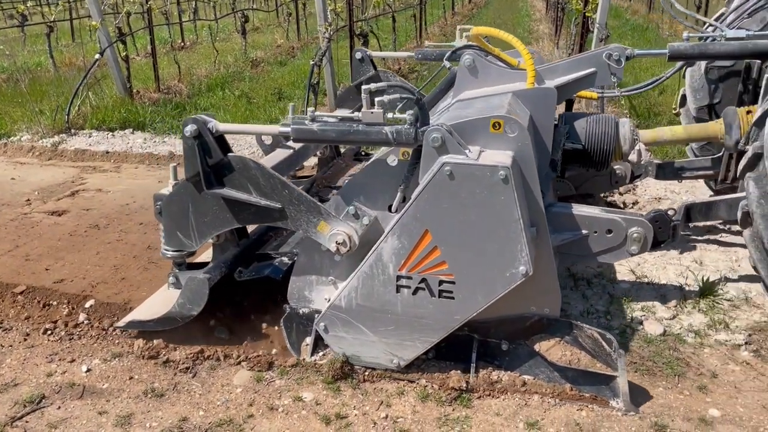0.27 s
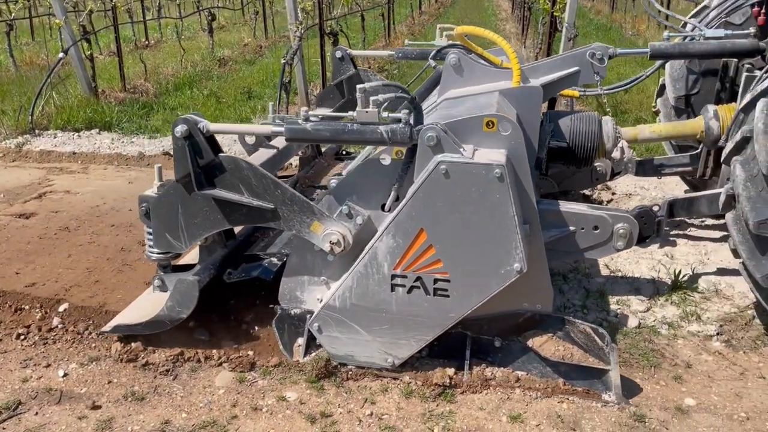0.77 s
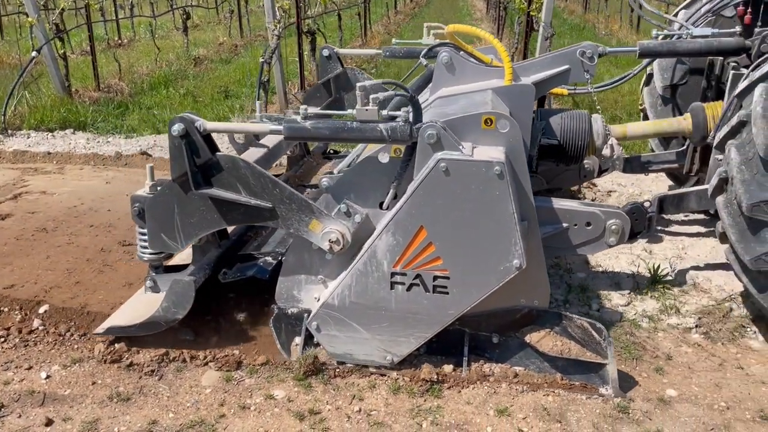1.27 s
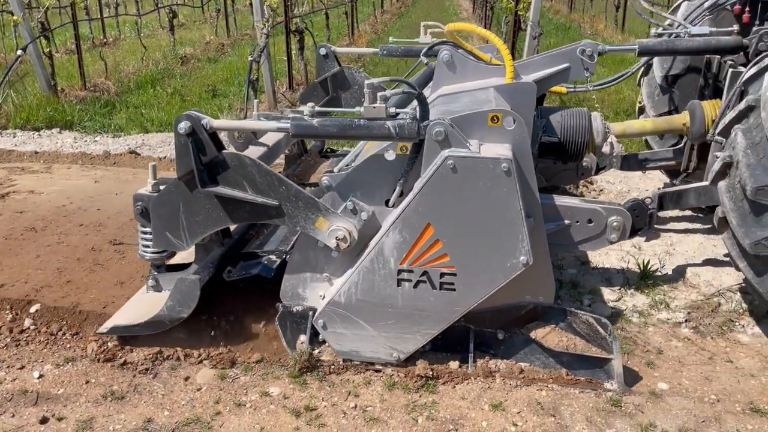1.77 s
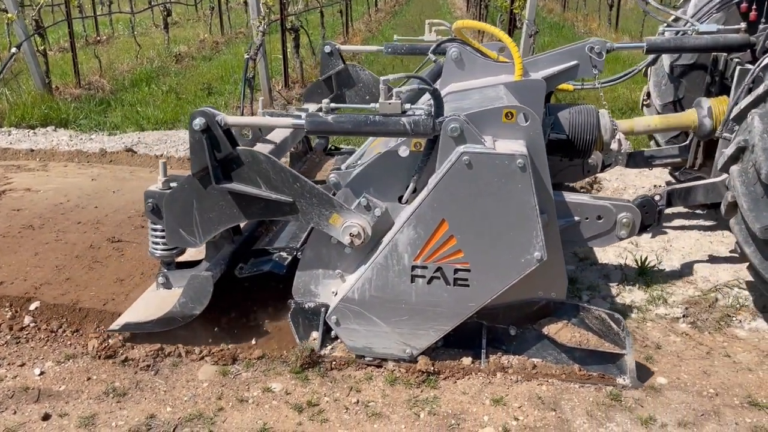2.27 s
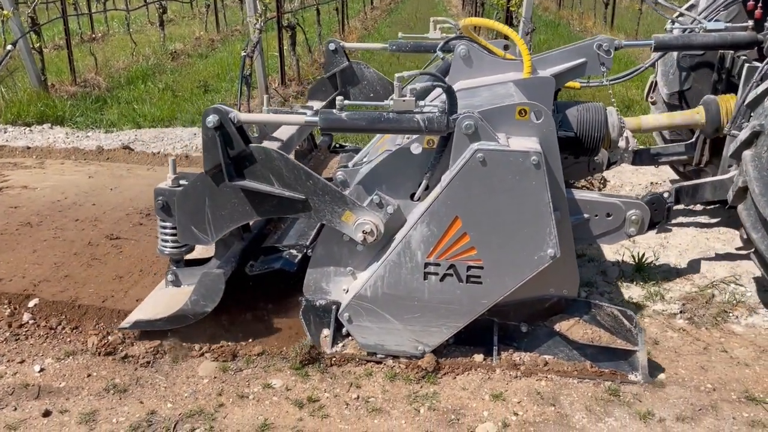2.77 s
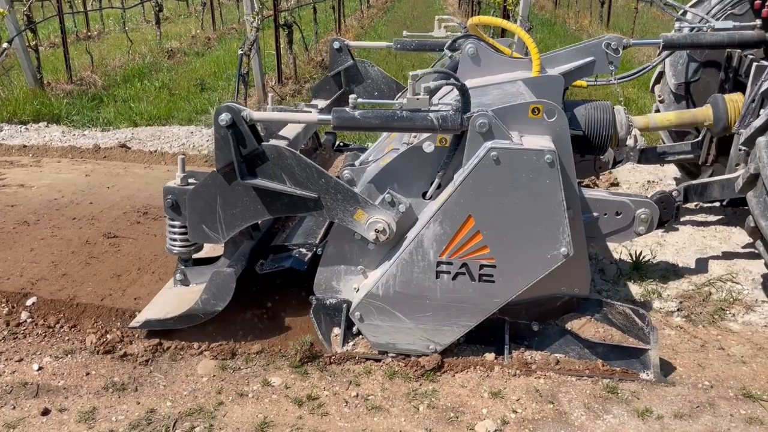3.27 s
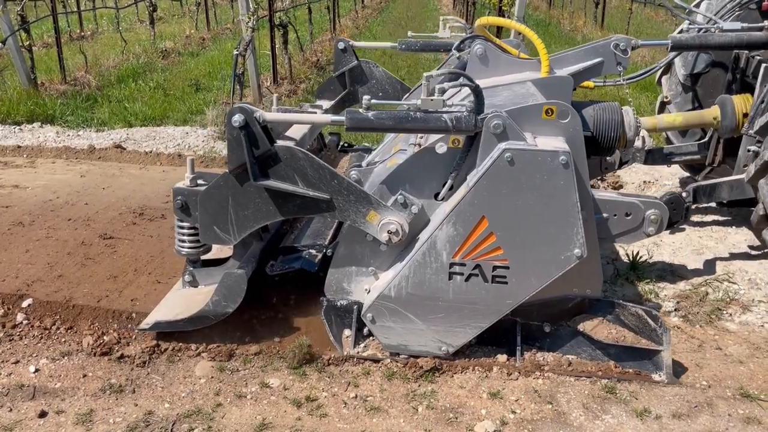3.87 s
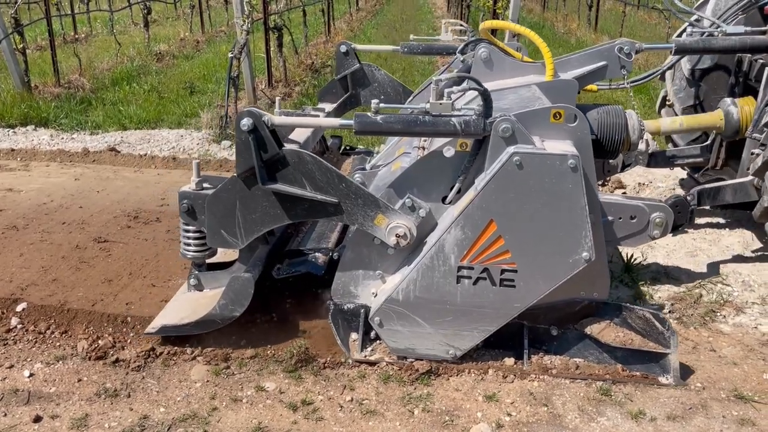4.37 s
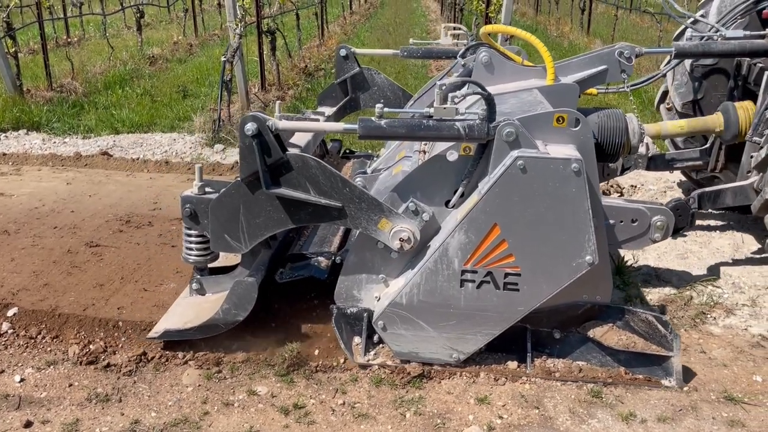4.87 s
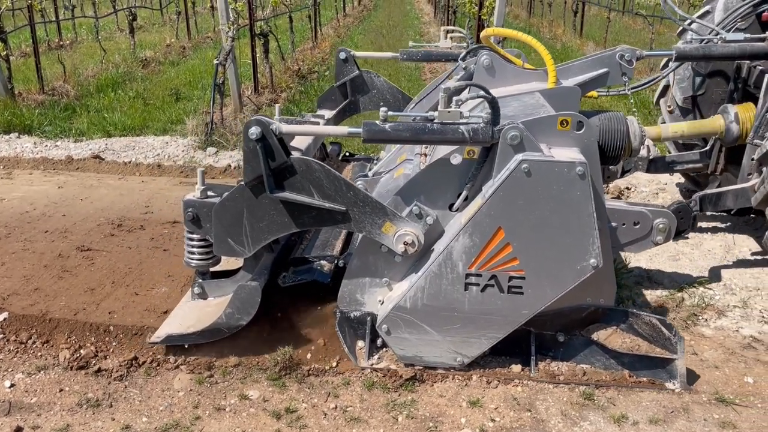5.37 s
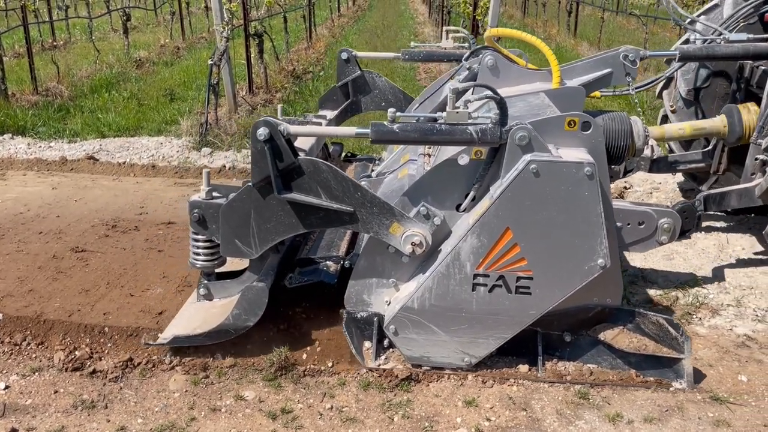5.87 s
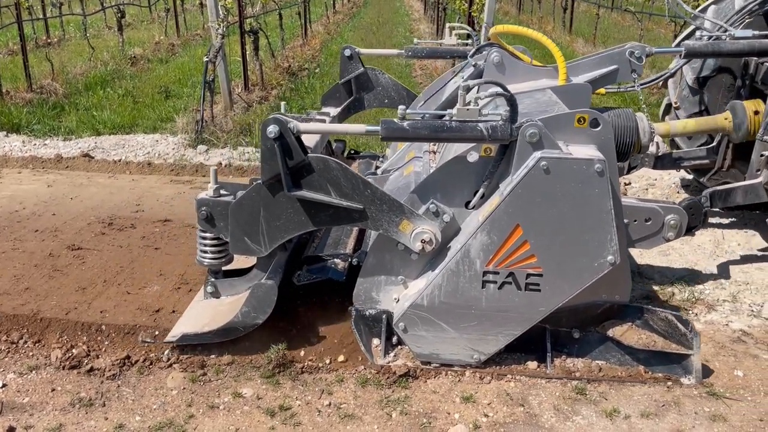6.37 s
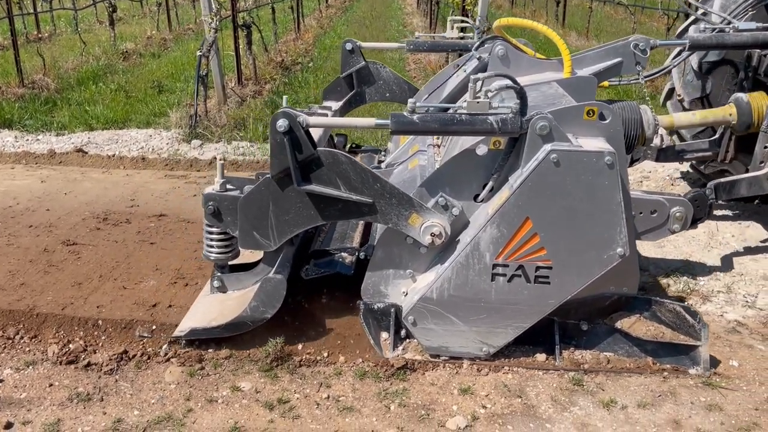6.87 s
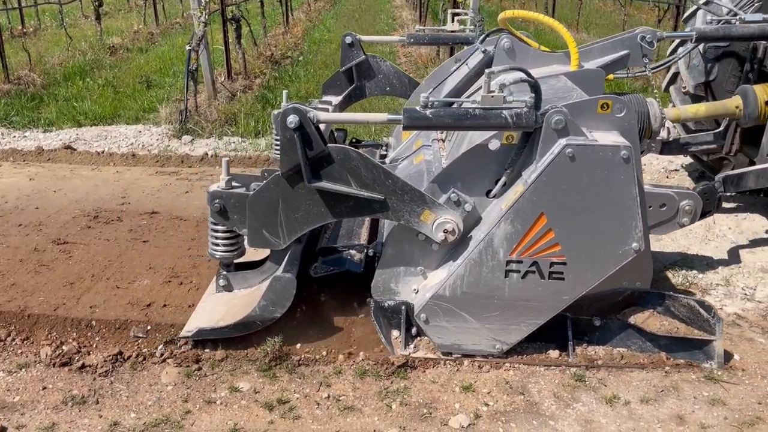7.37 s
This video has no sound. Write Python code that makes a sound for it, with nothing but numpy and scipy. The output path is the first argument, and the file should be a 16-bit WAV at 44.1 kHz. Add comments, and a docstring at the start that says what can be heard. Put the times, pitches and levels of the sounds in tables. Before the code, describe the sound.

Continuous gritty machine roar and diesel hum close by, broken by sharp stone snaps, dull knocks on steel and a few heavier crunches.

```python
"""A stone crusher is dragged slowly past by a tractor, a few metres away, in the open.
Its rotor roars as filtered noise and random knocks: soil, gravel and grit churned in a steel housing.
Under the roar, sine tones that follow one crankshaft make the hum of the diesel and the drive line.
Now and then a stone splits (a short noise burst and a ping) or is flung against the housing (a thud);
four boulders are struck, ground along the housing and broken."""
import sys
import numpy as np
from scipy import signal
from scipy.fft import rfft, irfft
from scipy.io import wavfile

SR = 44100
rng = np.random.default_rng(int(sys.argv[2]) if len(sys.argv) > 2 else 0)


def wav_record(signal):
    """Record a signal, one row per channel, as 16-bit PCM in the file named by sys.argv[1]."""
    frames = np.transpose(np.atleast_2d(signal))
    bounded = np.clip(frames, -1, 1)
    # unit amplitude maps onto the largest positive 16-bit level
    quanta = np.round(bounded * 32767).astype(np.int16)
    wavfile.write(sys.argv[1], SR, quanta)


N = 336042
T, BINS = np.arange(N) / SR, np.fft.rfftfreq(N, 1 / SR)  # time in s, frequencies in Hz
EDGE_HZ = 15800  # upper limit of the sound

# crankshaft speed, sagging as the rotor bites: time_s, speed (turns per second)
CRANK_SPEED = [(0.0, 31.29), (0.54, 31.51), (1.09, 31.12), (1.31, 31.04), (1.47, 31.29), (1.66, 31.4),
               (1.81, 31.31), (2.07, 31.45), (2.22, 31.33), (2.52, 31.47), (2.72, 31.26), (2.88, 31.59),
               (3.1, 31.65), (3.4, 31.23), (3.97, 31.13), (4.14, 31.32), (4.26, 31.25), (4.47, 31.61),
               (4.68, 31.64), (4.85, 31.5), (4.99, 31.2), (5.27, 31.11), (5.51, 31.49), (5.88, 31.08),
               (6.07, 31.15), (6.57, 31.02), (6.68, 31.11), (6.82, 30.93), (7.21, 31.06), (7.62, 31.45)]
ROTOR_RATIO, GEAR_RATIO = .4134, 24.29  # rotor turns and gear teeth per crankshaft turn
# the sag below the free speed (turns per second) is the load; the speed answers it this late
FREE_SPEED, INERTIA_S = 31.7, 0.17

# spectrum of the grit, before the housing colours it: pitch_hz, relative_db
GRIT_SPECTRUM = [(600, -25), (1800, -3.5), (2600, 0), (3700, -2.5), (4800, -5), (5600, -9), (7500, -10.3),
                 (9700, -15.5), (11000, -19), (12000, -20.2), (13000, -23.8), (15500, -25)]
# resonances of the steel housing: pitch_hz, width_hz, level_db against the direct sound
HOUSING_MODES = [(572, 52, 0.5), (662, 7.2, -2), (1005, 20, 1), (1099, 31, 1.5), (1321, 9.6, 5),
                 (1450, 21, 0), (1510, 59, -6), (1609, 30, 4), (1894, 93, 1.5), (2137, 11, -5.5),
                 (2490, 28, -6.5), (3660, 56, -17), (4750, 200, -3.5)]
# boulders, struck once, ground and then broken: strike_s, break_s, strike_db, ring_db, ring_hz, grinding_db,
# crack_db, brightness (dB per octave), crunch_db, crunch_hz, decay_s, anvil_db; function settings shift some
BOULDER_EVENTS = [(1.272, 1.333, -18.5, -12, 1238, -16, -23, 3.5, -24, 950, 0.02, -30),
                  (3.29, 3.3365, -17.5, -28, 1500, -32, -12.5, 0.5, -13, 610, 0.013, -16),
                  (4.089, 4.139, -20, -19, 2210, -9.5, -17.5, -3, -11.5, 725, 0.033, -10),
                  (4.627, 4.66, -27, -27, 1460, -28, -18.5, -2.5, -16.5, 704, 0.049, -15)]
GRIND_S = 0.1  # half width of the swell while a boulder labours in the chamber
PING_AFTER_S = .001  # a ring starts this long after its crack
BLOW_DECAY_S, PIECE_DECAY_S = 0.0085, 0.0036


def amp(db):
    """Turns decibels into a gain."""
    return 10 ** (np.asarray(db) / 20)


def evened(x):
    """Scales a sound to an average (rms) level of 1."""
    return x / np.sqrt(np.mean(x ** 2) + 1e-20)


def read(points, hz):
    """Reads a curve of frequency between its points, on a log-frequency axis."""
    f, value = np.transpose(points)
    return np.interp(np.log(hz + 1), np.log(f + 1), value)


def track(rows, axis=1):
    """Reads one column of a curve of time at every sample."""
    rows = np.asarray(rows)
    return np.interp(T, rows[:, 0], rows[:, axis])


def add(mix, s, sound):
    """Mixes a sound in, starting at time s."""
    part = mix[:, max(round(s * SR), 0):][:, :sound.shape[1]]
    part += sound[:, :part.shape[1]]


def wander(rate_hz):
    """A smooth random curve of rms 1, changing up to about rate_hz times a second."""
    slow = rfft(rng.standard_normal(N // 64))
    slow = irfft(slow / (1 + (BINS[:len(slow)] / rate_hz) ** 4))
    return evened(np.interp(T, np.linspace(0, T[-1], len(slow)), slow))


def colour(x, gain):
    """Filters a sound by a gain for each frequency."""
    return irfft(rfft(x) * gain, x.shape[-1])


def housing(hz):
    """Response of the steel casing: the direct sound plus its ringing panels."""
    return 1 + sum(amp(db) / (1 + 2j * (hz - f) / width) for f, width, db in HOUSING_MODES)


def ripple(hz, depth_db, spacing_hz=45):
    """Countless small modes of the steelwork leave fine peaks and dips, deepest in the treble."""
    knots = np.arange(0, SR / 2, spacing_hz)
    heights = rng.standard_normal(4096)[:len(knots)]
    depth = depth_db * np.minimum(hz / 2500, 1)  # full depth from 2500 Hz up
    return amp(depth * np.interp(hz, knots, heights))


def impacts(per_s, spread_db):
    """Random knocks, most small and a few large, on the direct and the scattered path."""
    strength = amp(spread_db * np.minimum(rng.exponential(1, N), 5))
    size = strength * (rng.random(N) < per_s / SR)
    return evened(size * rng.standard_normal((2, N)))


def nearness():
    """How far the machine has drawn alongside, as a share from 0 (far) to 1."""
    # time_s, share (0-1)
    alongside = [(0, 0.3), (1.5, 0.39), (2.9, 0.18), (3.6, 0.69), (5.4, 0.56), (5.8, 0.94), (7.62, 1)]
    return np.clip(track(alongside), 0, 1)


def swell(s, width_s):
    """A smooth rise to 1 and fall around time s."""
    return np.exp(-((T - s) / width_s) ** 2)


def flow_db(law):
    """Material gets louder with the load, with nearness and around each boulder."""
    idle_db, load_db, near_db, boulder_db = law
    sag = FREE_SPEED - np.interp(T + INERTIA_S, *np.transpose(CRANK_SPEED))
    grinding = sum(swell((row[0] + row[1]) / 2, GRIND_S) for row in BOULDER_EVENTS)
    return idle_db + load_db * sag + near_db * nearness() + boulder_db * grinding


def pockets_db():
    """Extra level (now and then a little less) while the rotor runs through coarse gravel."""
    # time_s, half_width_s, level_db
    pockets = [(.36, 0.027, 2.7), (.74, .14, -0.5), (3.43, .05, 2.5), (5.1, 0.025, 1), (5.55, 0.09, 0.4),
               (5.9, 0.17, .9), (6.26, 0.089, 2.2), (6.72, 0.1, 0.5), (7.02, .15, 0.3)]
    return sum(db * swell(s, width) for s, width, db in pockets)


def tone(cycles, jitter=0.16):
    """A sine of rms 1 with a slightly unsteady phase (jitter in radians)."""
    return np.sqrt(2) * np.sin(2 * np.pi * (cycles + rng.random()) + jitter * wander(3.0))


def tones(turns, table, flutter=0.35, jitter=0.068):
    """Multiples of one shaft; each flutters a little and shifts in level as the machine passes."""
    near = nearness()
    out = 0
    for multiple, far_db, near_db in table:
        level = amp(far_db) * (1 - near) + amp(near_db) * near
        out = out + level * (1 + flutter * wander(1.56)) * tone(multiple * turns, jitter)
    return out


def drive_line(turns, drone_flutter=0.4, drone_flutter_hz=7):
    """Diesel, rotor and gearbox all follow the crankshaft; their clearest tones swell and fade slowly."""
    # engine tones, half orders included: multiple of the crankshaft, far_db, alongside_db
    engine_tones = [(2, -53, -43.5), (4, -43, -42), (5, -37, -39), (5.5, -37, -48), (6, -38, -36.5),
                    (13, -45, -45), (16, -48, -59), (17, -44, -52), (23, -47, -57), (43, -55, -39),
                    (44, -52, -50), (45, -44, -42.5), (47, -43, -42), (50.5, -60, -45), (60, -52, -47),
                    (62, -54, -47)]
    # rotor and belt tones: multiple of the rotor, far_db, alongside_db
    rotor_tones = [(8, -38, -42), (11, -43, -58), (13, -55, -47), (16, -40, -41), (17, -44, -48),
                   (24, -52, -37), (32, -43, -47), (50, -41.5, -42)]
    # time_s, rotor_hum_db, gearbox_whine_db, its_octave_db, engine_whine_db, engine_whistle_db
    clear_levels = [(0, -38, -35, -52, -57, -47), (.6, -37.5, -38, -54, -40, -34.5),
                    (1.3, -30, -34, -52, -43, -52), (2, -32, -37, -37, -39.5, -45),
                    (2.7, -30.5, -36.5, -50, -40.5, -44), (3.25, -31, -32.5, -38, -33, -40),
                    (3.85, -27, -35, -36, -45, -37.5), (4.4, -31, -37, -40, -38.5, -39),
                    (5.1, -34, -35.5, -43, -44, -41), (6, -29.5, -39.5, -56, -44, -41),
                    (6.7, -29.5, -37.5, -55, -49, -37.5), (7.2, -34.5, -33.5, -47, -40.5, -38.5)]
    # parts of the engine whine: multiple of the crankshaft, relative_db
    whine_parts = [(15, 2.5), (21, -3), (30, 0)]
    # the rotor's low drone comes and goes with its bite: time_s, level_db before its flutter
    drone_levels = [(0, -39), (1.1, -36), (2.8, -43), (3.3, -39), (3.55, -30), (4, -33), (4.3, -28),
                    (4.7, -32), (5.15, -39), (5.6, -30.5), (6.1, -37), (6.6, -33), (7.62, -35)]
    rotor_turns, teeth = turns * ROTOR_RATIO, turns * GEAR_RATIO

    hum, whistle = tone(25 * rotor_turns), tone(31 * turns)
    engine_whine = sum(amp(db) * tone(multiple * turns) for multiple, db in whine_parts)
    clearest = [hum, tone(teeth), tone(2 * teeth), engine_whine, whistle]
    clear = sum(sound * amp(track(clear_levels, axis=k + 1)) for k, sound in enumerate(clearest))

    drone = tone(9 * rotor_turns) * amp(track(drone_levels))
    drone = drone * (1 + drone_flutter * wander(drone_flutter_hz))
    return clear + tones(turns, engine_tones) + tones(rotor_turns, rotor_tones) + drone


def soil(lumps_db=0.0):
    """Churned earth shakes the whole frame: a low rumble of filtered noise."""
    # pitch_hz, relative_db
    spectrum = [(20, -60), (30, -39), (40, -17), (60, -10), (85, -4), (115, 1), (170, -5), (250, -8),
                (400, -20), (900, -93)]
    # unloaded_db, db per turn a second of sag, extra_db alongside, extra_db around a boulder
    law = (-29, 1.6, 3, 4)
    rumble = evened(colour(rng.standard_normal((2, N)), amp(read(spectrum, BINS))))
    return rumble * amp(flow_db(law) + lumps_db * wander(8.1))


def gravel(turns, throb=0.067, firing=0.039, knocks=0.4, drum_hz=285, uneven_db=0.83):
    """Gravel drums on the housing, surging once a rotor turn and with each firing of the diesel."""
    # before the housing colours it: pitch_hz, relative_db
    spectrum = [(80, -22), (170, -7), (255, 1.5), (320, 2), (380, -4.5), (480, -2.5), (570, -4.5),
                (800, -1.5), (880, -9), (1200, -8.5), (1550, -9.5), (1770, -17.5), (2400, -14),
                (5000, -46.5)]
    # unloaded_db, db per turn a second of sag, extra_db alongside, extra_db around a boulder
    law = (-26.5, 2.5, 2, 0.9)
    # level of the coarse lumps against the gravel: far_db, alongside_db
    lumps_db = (-18, -5.5)
    near = nearness()
    drumming = knocks * impacts(1100, 1.6) + rng.standard_normal((2, N))
    rotor_surge = throb * near * np.sin(2 * np.pi * ROTOR_RATIO * turns)
    surge = 1 + rotor_surge + firing * np.sin(2 * np.pi * 2 * turns)  # two firings a turn
    steel = housing(BINS) * ripple(BINS, 2.7)
    roar = evened(colour(drumming * surge, amp(read(spectrum, BINS)) * steel))

    # larger lumps thump in a low, broad resonance of the chamber
    chamber = 1 / (1 + (np.log2((BINS + 1) / drum_hz) / 0.48) ** 4)
    lumps = evened(colour(impacts(170, 0.73) * surge, chamber))
    mixed = roar + amp(np.interp(near, [0, 1], lumps_db)) * lumps
    return mixed * amp(flow_db(law) + pockets_db() + uneven_db * wander(6.3))


def tumbling(low_hz=400, high_hz=2100, cycles=4, clump_db=2.5, pocket_share=1.7, count=24, size=4096):
    """Fist-sized stones tumble in the chamber in clumps, with hollow knocks of many pitches."""
    # unloaded_db, db per turn a second of sag, extra_db alongside, extra_db around a boulder
    law = (-38.5, 6, 3, 2)
    t, out = np.arange(size) / SR, np.zeros((2, N))
    for hz in np.geomspace(low_hz, high_hz, count):
        shape = (1 - np.exp(-t * hz)) * np.exp(-t * hz / cycles)
        knock = shape * np.sin(2 * np.pi * hz * t)
        # about 14 knocks a second at each pitch
        out += signal.oaconvolve(impacts(14, 2.0), knock[None], axes=1)[:, :N]
    return evened(out) * amp(flow_db(law) + pocket_share * pockets_db() + clump_db * wander(5.1))


def grit(chips=0.57, chip_s=0.011, flicker_db=0.65):
    """A hiss of fine grit with little bursts where chips break."""
    # unloaded_db, db per turn a second of sag, extra_db alongside, extra_db around a boulder
    law = (-34, 1.5, 2.5, 0)
    ticks = np.minimum(impacts(90, 2.5)[0] ** 2, 2500)
    # each tick leaves a burst that dies away over chip_s
    bursts = evened(np.sqrt(signal.lfilter([1], [1, -np.exp(-2 / (chip_s * SR))], ticks)))
    spray = rng.standard_normal((2, N)) * np.sqrt(1 + (chips * bursts) ** 2)
    spray = spray + 0.13 * impacts(1500, 2.5)
    steel = np.sqrt(housing(BINS)) * ripple(BINS, 2.3, spacing_hz=32)
    hiss = evened(colour(spray, amp(read(GRIT_SPECTRUM, BINS)) * steel))
    return hiss * amp(flow_db(law) + flicker_db * wander(7.1))


def blow(db, centre, decay, rise_cycles=1, narrow_db=5.5, rattle_db=3.0, rattle_s=0.0034,
         ring_db=-11, ring_s=0.014, ring_hz=2200, size=16384):
    """A stone rattles against the housing: noise around one pitch; the panels ring on briefly."""
    t, hz = np.arange(size) / SR, np.fft.rfftfreq(size, 1 / SR)
    octaves = np.log2((hz + 1) / centre)
    body = amp(-narrow_db * octaves ** 2 / np.sqrt(1 + (octaves / 2) ** 2))
    body = body / (1 + (75 / (hz + 1)) ** 4)  # little below 75 Hz
    rattle = amp(rattle_db * np.interp(t / rattle_s, np.arange(size), rng.standard_normal(size)))
    shape = (1 - np.exp(-t * centre / rise_cycles)) * np.exp(-t / decay)
    thud = evened(colour(rng.standard_normal((2, size)) * rattle, body) * shape)
    thud = thud * np.sqrt(np.mean(shape ** 2))

    ring = 0
    for f, width, level in HOUSING_MODES:
        gain = amp(level) / (1 + (2 * np.log2(f / ring_hz)) ** 2)
        fade = np.exp(-t * width / 30 / ring_s)  # a panel 30 Hz wide dies away over ring_s
        ring = ring + gain * fade * np.sin(2 * np.pi * (f * t + rng.random()))
    hardness = min(centre / 500, 1) ** 2  # deep, soft blows ring the panels less
    return amp(db) * (thud + amp(ring_db) * hardness * ring)


def thump(db, hz, decay, rise_cycles=0.4, size=16384):
    """One low mode, pushed once and dying away."""
    t = np.arange(size) / SR
    shape = (1 - np.exp(-t * hz / rise_cycles)) * np.exp(-t / decay)
    return amp(db) * np.sqrt(2) * shape / shape.max() * np.sin(2 * np.pi * hz * t) * np.ones((2, 1))


def blows(rattle_db=-3, solid_db=-9):
    """Stones that bounce off the housing unbroken: a solid knock inside a short rattle."""
    # start_s, level_db before the two shares above, centre_hz of the thud
    hits = [(0.244, -9, 110), (.325, -7.5, 185), (1.164, -17, 1400), (1.192, -21, 790), (1.281, -13, 327),
            (2.885, -11.5, 200), (3.637, -12, 910), (4.711, -7, 270), (4.729, -17, 730), (5.1, -12, 644),
            (5.235, -7.5, 202), (5.484, -8.5, 215), (6.026, -11, 242), (6.158, -13.5, 607),
            (6.198, -10, 252), (6.234, -12, 265), (6.256, -9.5, 416), (6.278, -4.5, 260),
            (6.307, -8.5, 280), (6.63, -10, 169), (6.978, -18, 1500), (7.108, -13, 1400),
            (7.124, -17, 1200)]
    out = np.zeros((2, N))
    for s, db, centre in hits:
        add(out, s, blow(db + rattle_db, centre, BLOW_DECAY_S))
        add(out, s, thump(db + solid_db, centre, BLOW_DECAY_S))
    return out


def crack(db, bright, decay, rise_s=0.0022, hold_s=0.0016, debris_db=-22, debris_s=0.027, size=8192):
    """A stone bursts in a few milliseconds with a tint of its own, then its splinters patter away."""
    t, hz = np.arange(size) / SR, np.fft.rfftfreq(size, 1 / SR)
    grains = rng.standard_normal((2, size)) * amp(3.0 * rng.standard_normal(size))
    tilt = amp(bright * np.log2(np.clip(hz, 1000, 9000) / 4000))
    tint = amp(read(GRIT_SPECTRUM, hz)) * tilt * ripple(hz, 2.5, spacing_hz=201.0)
    burst = evened(colour(grains, tint))
    shape = np.exp(-np.maximum(t - hold_s, 0) / decay) + amp(debris_db) * np.exp(-t / debris_s)
    return amp(db) * burst * shape * np.minimum(t / rise_s, 1)


def ping(db, hz, bounce_db=-6, bounce_s=0.0023, count=3, size=8192):
    """A stone's own modes, rung by the hammer and by quick bounces; high-pitched stones die sooner."""
    # multiple of the stone's pitch, relative_db
    modes = [(1, 0), (1.38, -13), (1.9, -12)]
    t, out = np.arange(size) / SR, np.zeros((2, size))
    for k in range(count):
        ring = sum(amp(level) * np.sin(2 * np.pi * (hz * ratio * t + rng.random((2, 1))))
                   for ratio, level in modes if hz * ratio < EDGE_HZ)
        shape = (1 - np.exp(-t * hz / 2)) * np.exp(-t * hz / 17)  # dies away over 17 cycles
        add(out, k * bounce_s * rng.uniform(0.52, 2.1), amp(db + k * bounce_db) * ring * shape)
    return out


def cracks(faint_db=-38, spread_db=1.5, spread_db_per_octave=4, ping_db=0.0, count=14,
           decay_s=0.021, halving_db_per_octave=5.5):
    """The loud stones split at set moments, each with its own ping; fainter ones split at random."""
    # start_s, level_db, brightness (dB per octave), pitch_hz of the ping
    loud = [(0.557, -27, 2, 7860), (0.9873, -18.5, 18, 10200), (1.055, -29.5, 6, 9800),
            (1.148, -30, 6, 9400), (1.162, -18, -1, 3750), (1.296, -27, 2, 3040), (1.316, -30, 2, 3330),
            (1.351, -40, -2, 2450), (1.695, -28, 12, 9000), (1.782, -27, 10, 7000), (1.806, -25, 2, 6000),
            (2.0137, -23, 16, 7550), (2.02, -32, -8, 2460), (2.125, -36, 18, 9000), (2.21, -31, 7, 6950),
            (3.038, -28, 5, 6800), (3.585, -20, 7, 7600), (3.655, -27, 7, 6100), (3.925, -30, 16, 7400),
            (4.208, -29, 2, 6260), (4.235, -29, -4, 2920), (4.365, -29, -3, 7000), (4.545, -25, 13, 9730),
            (4.777, -27, 3, 3570), (4.916, -27, 1, 4720), (5.007, -27, -1, 5260),
            (5.068, -25.5, -2.5, 2960), (5.339, -21.5, 6, 4730), (5.454, -28.5, 2, 3480),
            (5.9792, -25, -3, 3870), (6.9395, -16.5, 10, 6280), (6.9432, -27, 18, 5160),
            (6.976, -22.5, -0.5, 5600), (7.025, -27, 11, 7000), (7.105, -22.5, 2, 6300),
            (7.122, -29, 6, 2600), (7.13, -25, 4, 4300), (7.137, -25, 7, 9500), (7.144, -30, 0, 3900),
            (7.156, -25, 15, 6600), (7.431, -26, 5, 4430)]
    out = np.zeros((2, N))
    faint = []
    for _ in range(count):
        s, db = rng.uniform(0, T[-1]), faint_db + spread_db * rng.standard_normal()
        bright = spread_db_per_octave * rng.uniform(-.5, 1.1)
        faint.append((s, db, bright, rng.uniform(3230, 8230)))
    for s, db, bright, hz in loud + faint:
        # a small, bright stone dies sooner
        decay = decay_s * 2 ** (-bright / halving_db_per_octave)
        add(out, s, crack(db, bright, decay))
        add(out, s + PING_AFTER_S, ping(db + ping_db, hz))
    return out


def anvil(db, bounce_s=0.006, bounce_db=-4, rise_s=0.0012, count=3, size=16384):
    """A boulder knocks on the anvil plate a few times in quick succession; the plate's modes ring."""
    # modes damped by the soil packed around the plate: pitch_hz, relative_db, t60_s (time to fall 60 dB)
    modes = [(525, -4, 0.09), (608, -2, 0.11), (735, 0, 0.09), (921, -1, 0.07), (1510, -5, 0.07),
             (1911, -7, 0.08), (2140, -10, 0.09), (2525, -11, 0.08), (3460, -12, 0.07), (3720, -10, 0.06)]
    t, out = np.arange(size) / SR, np.zeros((2, size))
    whole = np.sqrt(sum(amp(level) ** 2 for _, level, _ in modes))
    for k in range(count):
        ring = sum(amp(level - 60 * t / t60) * np.sin(2 * np.pi * (hz * t + rng.random((2, 1))))
                   for hz, level, t60 in modes)
        knock = amp(db + k * bounce_db) * ring / whole * np.minimum(t / rise_s, 1)
        add(out, k * bounce_s * rng.uniform(.8, 1.2), knock)
    return out


def boulders(strike_hz=1150, strike_s=0.018, chip_db=-6, chip_s=0.013, ring_after_s=0.00302,
             grind_share=0.59, grind_s=0.03, crack_share=0.72,
             piece_db=-15.0, piece_gap_s=0.019, piece_fade_db=-4.0, count=4):
    """A boulder rings, grinds and cracks; the anvil clangs, its weight thumps and its pieces rattle."""
    # a boulder's weight heaves the whole frame: start_s, level_db, pitch_hz, decay_s
    heaves = [(1.303, -15.5, 106.5, 0.027), (1.333, -23, 151, 0.025), (3.3385, -12, 523, 0.0035),
              (3.345, -14.5, 176, 0.014), (3.388, -21, 182, 0.025), (4.137, -20, 150, 0.04),
              (4.158, -17, 201, 0.013), (4.6644, -10.5, 254, 0.0094)]
    out = np.zeros((2, N))
    for (struck, broken, strike_db, ring_db, ring_hz, grind_db, crack_db, bright,
         crunch_db, crunch_hz, decay, anvil_db) in BOULDER_EVENTS:
        # the hammer strikes, chips the boulder and rings it
        add(out, struck, blow(strike_db, strike_hz, strike_s))
        add(out, struck, crack(min(strike_db, crack_db) + chip_db, bright, chip_s))
        add(out, struck + ring_after_s, ping(ring_db, ring_hz, bounce_s=0.026))
        # the grinding swells in raggedly, deeper than the crunch
        grinding = blow(grind_db, grind_share * crunch_hz, grind_s, rise_cycles=4.4, rattle_db=3.0)
        add(out, struck + 0.57 * (broken - struck), grinding)
        # it breaks and knocks on the anvil plate
        add(out, broken, crack(crack_db, bright, crack_share * decay))
        add(out, broken, blow(crunch_db, crunch_hz, decay, narrow_db=6.0, rattle_db=-1.0))
        add(out, broken + PING_AFTER_S, anvil(anvil_db))
        for k in range(count):
            lands = broken + piece_gap_s * (k + rng.uniform(.7, 1.5))
            level_db = crunch_db + piece_db + k * piece_fade_db
            add(out, lands, blow(level_db, crunch_hz * 2 ** rng.uniform(-.5, 1), PIECE_DECAY_S))
    for s, db, hz, decay in heaves:
        add(out, s, thump(db, hz, decay))
    return out


def ports(direct, scattered):
    """Two microphone ports share the direct sound and hear the scattered sound differently."""
    # pitch_hz, likeness of the two ports (0-1)
    likeness = [(100, .993), (300, .98), (700, .92), (1400, .88), (2000, .72), (2900, .6), (3700, .77),
                (5100, .52), (6200, .85), (8100, .99), (9500, .85), (11600, .97), (13000, .65),
                (14300, .995)]
    # pitch_hz, left_minus_right_db
    balance = [(100, .3), (600, 1), (1300, 4.2), (1800, 2.5), (2200, 4.7), (3700, 1.2), (4900, 3.2),
               (6500, 1), (8000, 0)]
    # pitch_hz, lead of the left port (radians)
    lead = [(200, 0), (1100, -.35), (1500, -.8), (2200, -.6), (2600, .3), (4200, .3), (5000, .8),
            (6800, -1.2), (7900, -3.05), (8600, -3.25), (10800, -6.1), (12300, -6.4), (13900, -9.35),
            (16000, -9.45)]
    same = np.clip(read(likeness, BINS), 0, 1)
    shared = colour(direct, np.sqrt((1 + same) / 2))
    apart = colour(scattered, np.sqrt((1 - same) / 2))
    # each side takes half of the level and phase difference
    lean = amp(read(balance, BINS) / 2) * np.exp(.5j * read(lead, BINS))
    return np.array([colour(shared + apart, lean), colour(shared - apart, 1 / lean)])


def scene():
    """The whole machine, heard from beside the track."""
    turns = np.cumsum(track(CRANK_SPEED)) / SR
    material = soil() + gravel(turns) + tumbling() + grit()
    direct, scattered = material + blows() + cracks() + boulders()
    return ports(direct + drive_line(turns), scattered)


def record(dry):
    """Rounds off the highest peaks, then removes what lies above the upper limit."""
    rounded = dry / (1 + dry ** 6) ** (1 / 6)
    lowpass = signal.firwin(511, EDGE_HZ, window=("kaiser", 9), fs=SR)
    return signal.oaconvolve(rounded, lowpass[None], "same")


dry = scene()
out = record(dry)
wav_record(out)
```